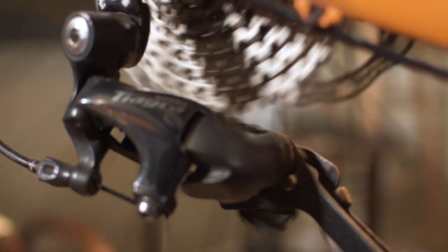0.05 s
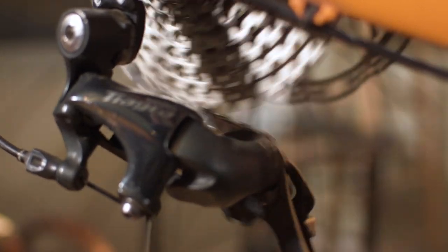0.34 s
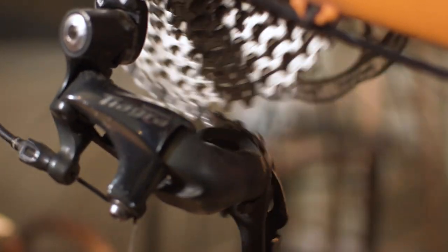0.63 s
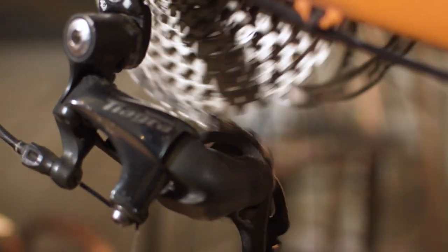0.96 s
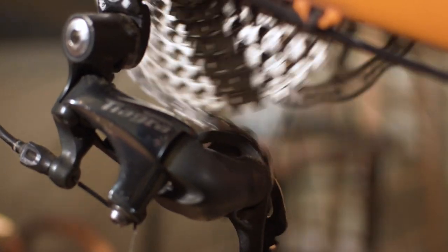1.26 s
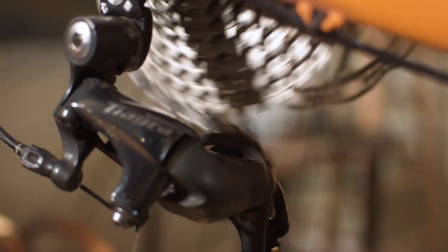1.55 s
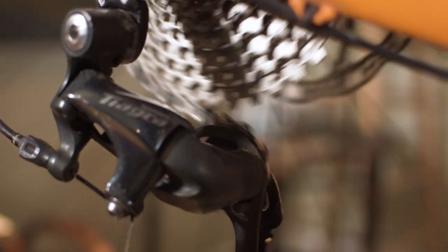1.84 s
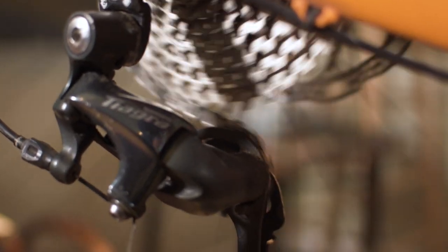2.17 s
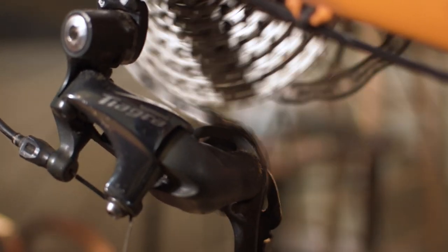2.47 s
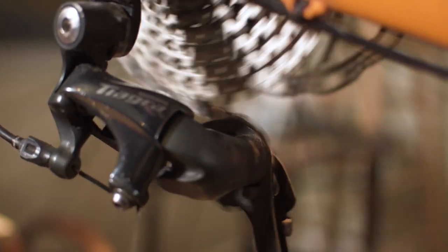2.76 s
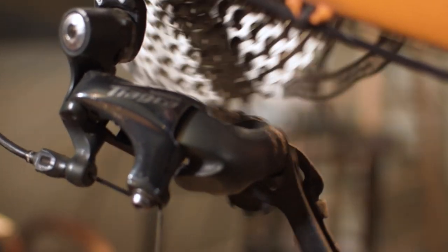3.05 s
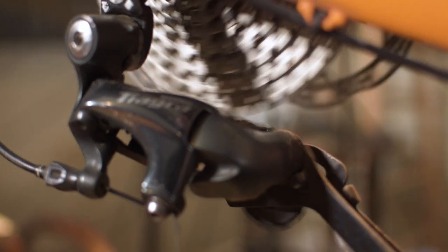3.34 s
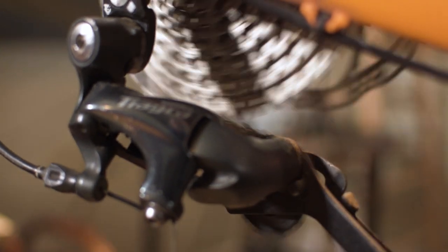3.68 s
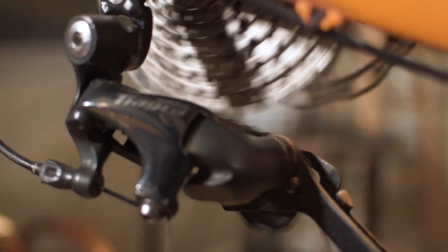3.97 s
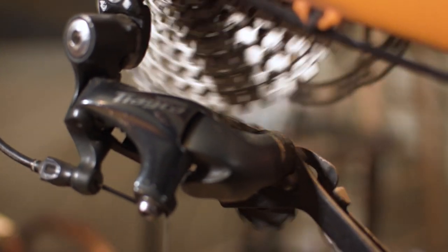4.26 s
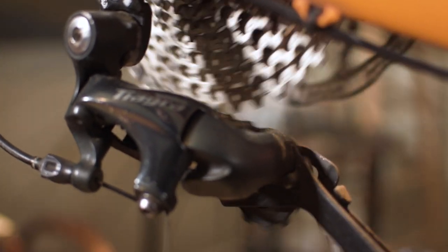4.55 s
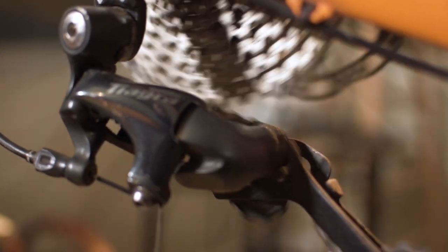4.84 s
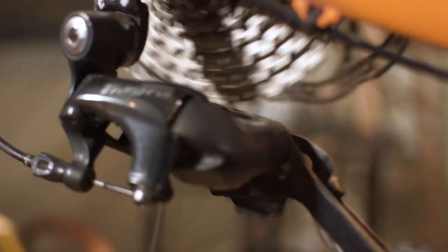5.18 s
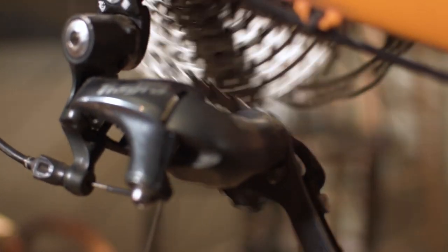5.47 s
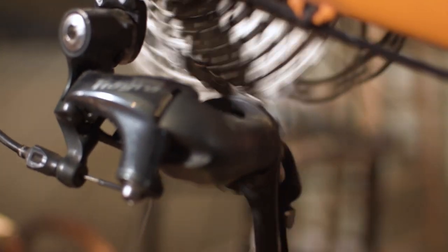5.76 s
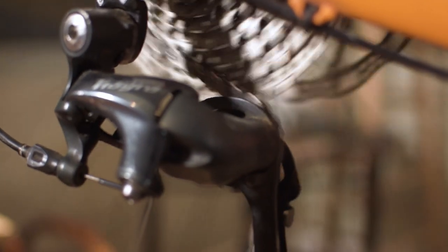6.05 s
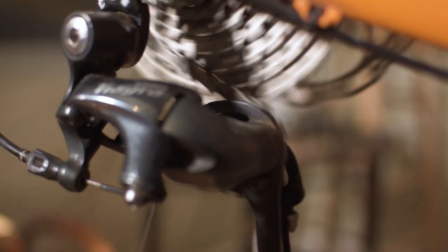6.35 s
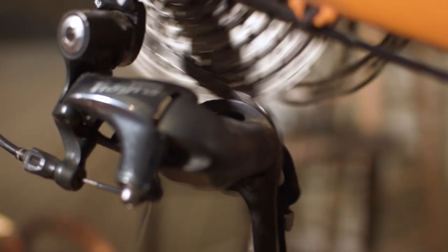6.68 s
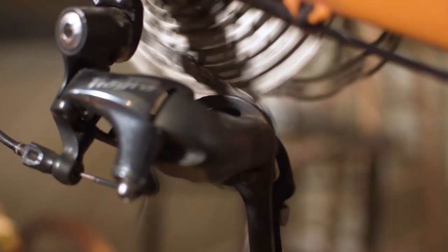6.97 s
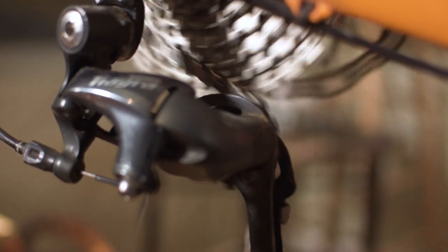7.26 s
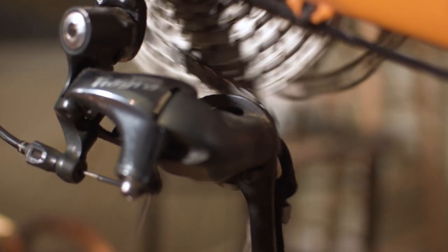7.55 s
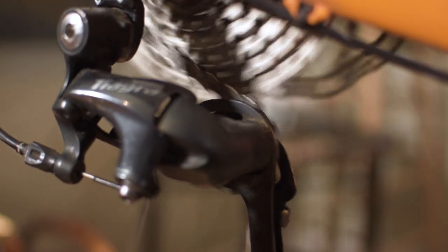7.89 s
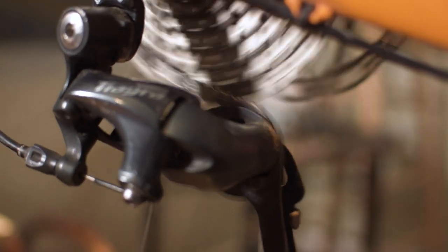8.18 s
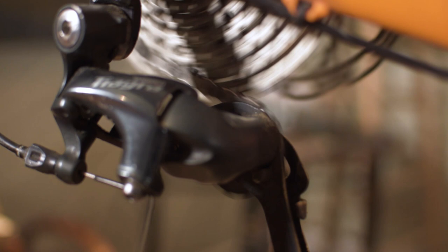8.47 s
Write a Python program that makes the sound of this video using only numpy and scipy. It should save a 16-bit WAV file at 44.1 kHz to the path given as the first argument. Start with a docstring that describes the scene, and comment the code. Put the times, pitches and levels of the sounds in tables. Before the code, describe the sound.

A bicycle chain ticks and rattles quickly over the rear sprockets, with sharp gear-shift snaps and short runs of freehub clicks.

```python
"""A bicycle chain ticks and rattles close to a stereo microphone, in a hard-walled workshop.
The bicycle is on a repair stand, pedalled by hand and shifted through its gears. Every link ticks over
the pulleys and seats on a sprocket; at a shift the derailleur snaps and the chain drops onto the next
sprocket. The freehub pawls click whenever the wheel overruns. Behind it all, the walls answer."""
import sys
import numpy as np
from scipy import signal
from scipy.fft import rfft, irfft, next_fast_len
from scipy.io import wavfile
from scipy.ndimage import uniform_filter1d

SR = 44100
rng = np.random.default_rng(int(sys.argv[2]) if len(sys.argv) > 2 else 0)


def file_out(sig):
    """Save sig as 16-bit WAV at sys.argv[1]."""
    # one column per channel
    cols = np.atleast_2d(sig).T
    # limit, then scale
    lim = np.clip(cols, -1, 1)
    pcm = np.round(lim * 32767).astype(np.int16)
    wavfile.write(sys.argv[1], SR, pcm)


N = 375732


# the running chain under tension, relative levels: time_s, knock_db, tick_db
CHAIN_LEVELS = [(0, -31.5, -42), (0.3, -46.5, -49), (1.05, -50.5, -47), (1.55, -48, -52), (2.1, -52, -52),
                (2.63, -45, -43), (2.82, -48, -49.5), (3.15, -45, -46), (4.05, -44.5, -42.5),
                (4.6, -48.5, -48), (5.3, -42.5, -50.5), (5.78, -47.5, -44.5), (6.05, -48.5, -53),
                (6.35, -50.5, -52), (7.05, -48.5, -46), (7.5, -47.5, -47), (8.52, -47.5, -46)]
SLACK_KNOCK_DB, SLACK_TICK_DB = -1.5, -5

def chain():
    """The chain, right at the microphone, quieter while it runs slack. Gives (ticks, rattle)."""
    knock_db, tick_db = curves(CHAIN_LEVELS) + np.outer([SLACK_KNOCK_DB, SLACK_TICK_DB], slack())
    ticks = amp(tick_db - 6.5) * link_ticks()
    rattle = amp(knock_db - 6) * roller_knocks() + amp(knock_db - 9) * plate_rustle()
    return ticks, rattle


# how hard the narrow inner links meet the pulley in each gear, against the outer links: time_s, level_db
INNER_LINK_LEVELS = [(3.2, -3), (3.5, -6), (4.6, -20), (6.0, 3), (7.2, -3), (8.3, -3)]
# spectrum of a link's tick: frequency_hz, level_db
TICK_SPECTRUM = [(200, -73), (600, -33), (2000, -10), (5000, -6), (8000, -2), (10500, -3.5), (13000, -10.5),
                 (16000, -30)]
# resonances of a link: pitch_hz, width_hz, lift_db
LINK_RESONANCES = [(6400, 300, 6), (7600, 860, 6), (9100, 430, 5.5), (9720, 650, 5.5), (11900, 1600, 6)]

def link_ticks():
    """Each link seats on the sprocket; inner and outer links strike the pulley in turn."""
    seat = link_train(0.01, every=1, t60=0.016, scatter_db=1.6, jitter_s=0.0003, snap=0.2)
    inner = link_train(0.7, every=2, t60=0.017, scatter_db=2, jitter_s=0.0004, snap=0.2)
    outer = link_train(1.74, every=2, t60=0.014, scatter_db=2, jitter_s=0.0004, snap=0.2)
    pulley = amp(-5) * (outer + amp(curves(INNER_LINK_LEVELS)[0]) * inner)
    return unit(coloured(seat + pulley, lambda hz: along(TICK_SPECTRUM, hz) + peaks(LINK_RESONANCES, hz)))


# spectrum of a roller's knock: frequency_hz, level_db
KNOCK_SPECTRUM = [(40, -17.5), (120, -20.5), (300, -19.5), (550, -13), (950, 3.5), (1200, 1.5), (1500, 5.5),
                  (2600, 4), (4500, -1), (6000, -5), (11000, -21.5), (16000, -28)]

def roller_knocks():
    """Every second link knocks, very unevenly, and all the rollers rattle in their play."""
    heavy = link_train(0.62, every=2, t60=0.016, scatter_db=9.5, jitter_s=0.001052, snap=0.64)
    loose = link_train(0.62, every=1, t60=0.01, scatter_db=1, jitter_s=0.007, snap=0.52)
    return unit(coloured(heavy + amp(1.5) * loose, lambda hz: along(KNOCK_SPECTRUM, hz)))


# spectrum of the sliding plates: frequency_hz, level_db
RUSTLE_SPECTRUM = [(20, -8), (45, -51), (80, -27.5), (120, -8), (160, -23.5), (300, -11.5), (520, 0),
                   (900, 3.5), (2400, -3.5), (4300, -5), (5500, -11), (10000, -6.5), (12000, -17),
                   (14000, -54), (16000, -24)]

def plate_rustle():
    """The link plates slide on the teeth and make a steady noise."""
    return unit(coloured(rng.standard_normal(N), lambda hz: along(RUSTLE_SPECTRUM, hz)))


# the hand-pedalled chain's speed: time_s, links_per_s
CHAIN_SPEED = [(0.0, 24.6), (0.65, 20.8), (1.78, 37.0), (2.21, 35.2), (2.81, 36.1), (3.03, 34.3),
               (4.03, 41.3), (4.53, 40.8), (4.94, 36.2), (5.25, 37.3), (5.73, 31.7), (6.24, 30.1),
               (6.59, 35.2), (7.25, 38.7), (7.47, 36.4), (8.15, 37.5), (8.5, 43.6)]

def link_train(offset_links, every, t60, scatter_db, jitter_s, snap):
    """One contact each time the chain has moved on by `every` links; rms 1."""
    travel = np.cumsum(curves(CHAIN_SPEED)[0]) / SR
    times = np.interp(np.arange(offset_links, travel[-1], every), travel, np.arange(N) / SR)
    track = np.zeros(N)
    for s, (late, force) in zip(times, rng.standard_normal((len(times), 2))):
        add(track, s + jitter_s * late, amp(scatter_db * np.tanh(force)) * contact(t60, snap))
    return unit(track)


def shifts():
    """Snaps, drops and catches shake the frame. Gives (close sound, sound sent into the room)."""
    tracks = np.zeros((2, N))
    derailleur_snaps(tracks)
    chain_drops(tracks)
    link_catches(tracks)
    return amp(30.5) * tracks  # the levels in their tables are relative to this gain


# snaps of the derailleur: start_s, level_db, bass_db, treble_db, pitch_hz, echo_db
DERAILLEUR_SNAPS = [(0.0412, -14, -12.5, -15, 2360, -15), (0.25, -16.5, -4, -8.5, 1650, -3),
                    (3.4845, -34, -4.5, -5.5, 4400, -5), (5.316, -28.5, -4.5, -1, 4150, -3.5)]
# resonances of the derailleur: pitch_hz, width_hz, lift_db
DERAILLEUR_RESONANCES = [(800, 160, 4), (1530, 500, 3), (2350, 360, 6), (4330, 500, 5.5),
                         (13000, 2500, 5.5)]

def derailleur_snaps(tracks):
    """The derailleur snaps to its next index and resonates along with the part it strikes."""
    for s, db, bass_db, treble_db, pitch_hz, echo_db in DERAILLEUR_SNAPS:
        part = lambda hz: peaks(DERAILLEUR_RESONANCES, hz) + struck_part(hz, pitch_hz, lift_db=3.5)
        clunk(tracks, s, db, part, bass_db, treble_db, t60=0.014, echo_db=echo_db)


# landings of the chain: start_s, level_db, bass_db, treble_db, chatter_t60_s, pitch_hz, lift_db, ring_db
CHAIN_DROPS = [(0.586, -44, 2.5, -5, 0.064, 4950, 7, -8), (0.604, -26.5, -6.5, 5, 0.012, 1270, 3.5, -2),
               (0.7308, -35, -5, 1.5, 0.038, 820, 5.5, 2), (2.9616, -34, 1, -7, 0.014, 260, 13, -28),
               (2.9667, -35.5, -0.5, -6, 0.093, 2180, 15.5, -26),
               (5.6547, -33.5, -14, -6, 0.088, 620, 9, -26),
               (5.6684, -33, 4.5, -5.5, 0.035, 2670, 9.5, -23),
               (5.7884, -27.5, -9, 2.5, 0.015, 3100, 12, -20),
               (5.7905, -25, -5.5, -7, 0.02, 2220, 10.5, -18),
               (5.8111, -30.5, 1.5, -2.5, 0.021, 524, -1, -22),
               (8.0894, -27.5, -12.5, 0, 0.03, 334, 18, -10),
               (8.139, -32.5, -3.5, 0.5, 0.025, 3230, 11, -7)]

def chain_drops(tracks):
    """The chain drops onto a sprocket and sets the cassette ringing, close to the microphone."""
    close, _ = tracks
    for s, db, bass_db, treble_db, t60, pitch_hz, lift_db, ring_db in CHAIN_DROPS:
        part = lambda hz: struck_part(hz, pitch_hz, lift_db)
        clunk(tracks, s, db, part, bass_db, treble_db, t60, echo_db=-3)
        add(close, s, amp(db + ring_db) * sprocket_ring())


# modes of a sprocket: pitch_hz, level_db, t60_s
SPROCKET_MODES = [(2960, 0, 0.14), (3920, -4, 0.27), (4740, -1, 0.36), (5890, -8.5, 0.58), (5900, -29, .34),
                  (7400, 8.5, .2), (8000, 3, .15), (8920, 1, 0.32), (10430, 0, .3), (11800, -9, 0.18),
                  (13600, -10, .18)]

def sprocket_ring():
    """Three neighbouring sprockets ring together, so each mode is a close cluster; energy 1."""
    t = np.arange(SR // 5) / SR
    ring = np.zeros(len(t))
    for hz, db, t60 in SPROCKET_MODES:
        cluster = hz * (1 + 0.003 * rng.standard_normal((3, 1)))
        ring += amp(db - 60 * t / t60) * np.sin(2 * np.pi * cluster * t).sum(axis=0)
    return ring / np.linalg.norm(ring)


# links that catch: start_s, level_db, pitch_hz
LINK_CATCHES = [(0.05, -28, 2460), (0.086, -32.5, 790), (0.711, -37, 7600), (2.389, -45.5, 1010),
                (2.57, -39.5, 4100), (2.6389, -40, 960), (2.6486, -37.5, 1170), (2.8798, -41.5, 1500),
                (2.981, -37, 1970), (3.0195, -36.5, 2180), (3.545, -41, 970), (3.9846, -42, 1920),
                (4.8263, -43.5, 1600), (4.975, -40, 3220), (5.081, -39.5, 1550), (5.1993, -37, 870),
                (5.3995, -40, 3340), (5.8399, -40, 2880), (5.8962, -36.5, 860), (6.123, -48, 1920),
                (6.6269, -48, 870), (6.6828, -50.5, 910), (7.9965, -35, 1460), (8.243, -41.5, 4070)]

def link_catches(tracks):
    """A link catches on a tooth and slips off."""
    for s, db, pitch_hz in LINK_CATCHES:
        part = lambda hz: struck_part(hz, pitch_hz, lift_db=7)
        clunk(tracks, s, db, part, bass_db=-8, treble_db=-8, t60=0.016, echo_db=0)


# spectrum of a blow to the frame: frequency_hz, level_db
CLUNK_SPECTRUM = [(30, -40), (90, -42), (180, -7), (260, -12.5), (400, -3.5), (520, 5), (850, 5.5),
                  (1200, 3.5), (2000, 2), (4300, -1), (6500, 2), (10000, 1), (13000, -7), (16000, -18)]
# where a blow's bass_db and treble_db act: frequency_hz, share
BASS_SHELF = [(750, 1), (1300, 0)]
TREBLE_SHELF = [(4500, 0), (6500, 1)]
SCRAPE_DB, SCRAPE_LEAD_S = -17.5, 0.0035

def clunk(tracks, s, db, part, bass_db, treble_db, t60, echo_db):
    """A part scrapes, then slams home; a sharper copy of the blow goes out to the walls."""
    close, sent = tracks
    shelves = lambda hz: bass_db * along(BASS_SHELF, hz) + treble_db * along(TREBLE_SHELF, hz)
    body = lambda hz: along(CLUNK_SPECTRUM, hz) + shelves(hz) + part(hz)
    add(close, s - SCRAPE_LEAD_S, amp(db + SCRAPE_DB) * coloured(contact(t60=0.043, snap=0), body))
    add(close, s, amp(db) * coloured(contact(t60, snap=0.66), body))
    add(sent, s, amp(db + echo_db) * coloured(contact(t60, snap=2.26), body))


# the wheel overruns the cassette, one run a row: start_s of each ratchet tooth that passes
OVERRUN_TEETH = [(.786, .867, .96, 1.111, 1.274), (1.804, 1.947, 2.115, 2.294, 2.382), (3.14, 3.27),
                 (4.324, 4.433, 4.519, 4.581, 4.648, 4.765, 4.886, 4.988, 5.087, 5.259),
                 (7.27, 7.346, 7.413, 7.51, 7.689), (7.986, 8.069)]
# spectrum of a pawl's click: frequency_hz, level_db
PAWL_SPECTRUM = [(100, -42), (500, -31), (1000, -28), (2200, -3.5), (3400, -4.5), (4200, 1), (6000, -2.5),
                 (9500, -0.5), (11500, -9), (16000, -17)]
# resonances of the freehub shell: pitch_hz, width_hz, lift_db
SHELL_RESONANCES = [(3020, 790, 9), (3960, 350, 5.5), (5920, 290, 5), (7600, 380, 4.5), (8800, 700, 4),
                    (12800, 510, 7)]
TOOTH_S, PAWL_LAG_S = 0.1, 0.0044  # a typical time per tooth, and how far the second pawl then trails

def freehub():
    """Two pawls drop off each tooth; the slower the overrun, the softer and further apart they click."""
    track = np.zeros(N)
    for run in OVERRUN_TEETH:
        for s, slowness in zip(run, np.gradient(run) / TOOTH_S):
            force = amp(-0.9 * np.log2(slowness))
            lag_s = PAWL_LAG_S * slowness ** 1.5
            add(track, s, force * amp(-9.2) * contact(t60=0.031, snap=0.46))
            add(track, s + lag_s, force * amp(-9) * contact(t60=0.027, snap=0.2))
    return coloured(track, lambda hz: along(PAWL_SPECTRUM, hz) + peaks(SHELL_RESONANCES, hz))


def slack(fade_s=0.19):
    """1 while the wheel overruns the chain, 0 while the chain drives it."""
    return sum(curves([(run[0] - fade_s, 0), (run[0], 1), (run[-1], 1), (run[-1] + fade_s, 0)])[0]
               for run in OVERRUN_TEETH)


# how long the workshop's hard walls ring: frequency_hz, t60_s
WORKSHOP_DECAY = [(100, 0.54), (550, 0.52), (1500, 0.38), (4000, 0.39), (9000, 0.26), (15000, 0.21)]

def room_tail(build_up_s=0.00075):
    """Diffuse echoes that build up, then die faster in the treble; energy 1."""
    hz, t, noise = signal.stft(rng.standard_normal(SR * 3 // 4), SR, nperseg=256)
    decay = amp(-60 * t / along(WORKSHOP_DECAY, hz)[:, None])
    tail = signal.istft(noise * decay, SR, nperseg=256)[1]
    tail *= 1 - np.exp(-np.arange(len(tail)) / SR / build_up_s)
    return tail / np.linalg.norm(tail)


def workshop(x, tails=4, block=1024):
    """The room behind the bicycle; echo tails alternate at random, so it is smooth, with no ringing."""
    chosen = np.repeat(rng.integers(tails, size=N // block + 1), block)[:N]
    shares = [np.abs(uniform_filter1d((chosen == k).astype(float), block // 2)) for k in range(tails)]
    return sum(signal.fftconvolve(x * np.sqrt(share), room_tail())[:N] for share in shares)


def contact(t60, snap, size=4096):
    """Steel meets steel: an impulse of height snap, then chatter that swells and dies; energy 1."""
    life = np.arange(size) / SR / max(t60, 1e-3)
    chatter = rng.standard_normal(size) * amp(-60 * life) * (1 - np.exp(-life / 0.016))
    chatter /= np.linalg.norm(chatter)
    chatter[0] = snap
    return chatter / np.linalg.norm(chatter)


def struck_part(hz, pitch_hz, lift_db):
    """Gain in dB of a struck part's one broad resonance."""
    return lift_db / (1 + (np.log((hz + 1) / pitch_hz) / 0.21) ** 2)


def peaks(resonances, hz):
    """Gain in dB of (pitch_hz, width_hz, lift_db) resonances."""
    return sum(db / (1 + (2 * (hz - f) / width) ** 2) for f, width, db in resonances)


def amp(db):
    """Decibels as an amplitude."""
    return 10 ** (np.asarray(db) / 20)


def unit(x):
    """x at rms 1."""
    return x / np.sqrt(np.mean(x ** 2) + 1e-20)


def along(points, hz):
    """Interpolate (frequency_hz, value) points on a log axis."""
    f, v = np.transpose(points)
    return np.interp(np.log(hz + 1), np.log(f + 1), v)


def curves(rows):
    """One value per sample for each column after the time."""
    s, *cols = np.transpose(rows)
    return [np.interp(np.arange(N) / SR, s, c) for c in cols]


def add(track, s, sound):
    """Mix a sound into the track at time s."""
    start = int(np.clip(round(s * SR), 0, N))
    track[start:start + len(sound)] += sound[:N - start]


def coloured(x, gain_db, size=4096):
    """x through the causal filter whose gain in dB is a function of frequency."""
    cepstrum = irfft(np.log(amp(gain_db(np.fft.rfftfreq(size, 1 / SR)))))
    cepstrum[1:size // 2] *= 2
    cepstrum[size // 2 + 1:] = 0
    return signal.fftconvolve(x, irfft(np.exp(rfft(cepstrum))))[:len(x)]


def filtered(x, response):
    """x times a complex response of frequency."""
    size = next_fast_len(N + SR // 2)
    return irfft(rfft(x, size) * response(np.fft.rfftfreq(size, 1 / SR)), size)[..., :N]


def capsules(x, lag_s):
    """The sound reaches the microphone's right capsule lag_s before the left."""
    return filtered(x, lambda hz: np.exp(np.pi * 1j * hz * lag_s * np.array([[-1], [1]])))


# stereo width of the echoes at the microphone: frequency_hz, side_to_mid_db
ECHO_WIDTH = [(30, -3), (200, -26), (500, -25), (1300, -30), (2500, -13), (5000, -9), (10000, -6.5),
              (15000, -3)]

def scene():
    """The bicycle up close, with echoes behind it that are narrow in the mids and wide in the treble."""
    ticks, rattle = chain()
    clicks = freehub()
    clunks, clunks_sent = shifts()
    direct = capsules(ticks + rattle + clicks, lag_s=1.5e-5) + capsules(clunks, lag_s=2.2e-5)
    sent = amp(-9) * ticks + amp(-2) * rattle + amp(-4.5) * clicks + clunks_sent
    mid = workshop(sent)
    side = filtered(workshop(sent), lambda hz: amp(along(ECHO_WIDTH, hz)))
    return direct + np.array([mid + side, mid - side])


def record(dry):
    """The recorder clips at full scale and keeps nothing above 16.1 kHz."""
    return filtered(np.clip(dry, -1, 1), lambda hz: hz < 16100)


dry = scene()
out = record(dry)
file_out(out)
```